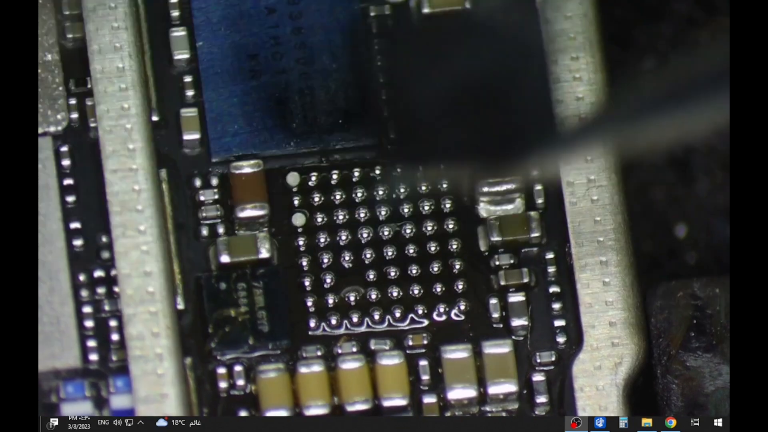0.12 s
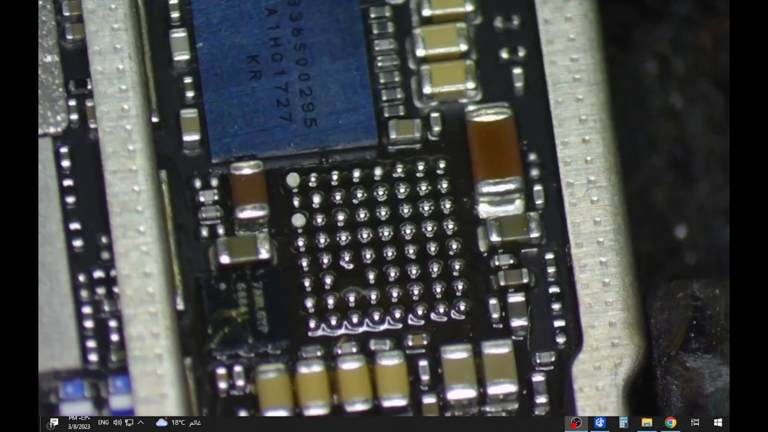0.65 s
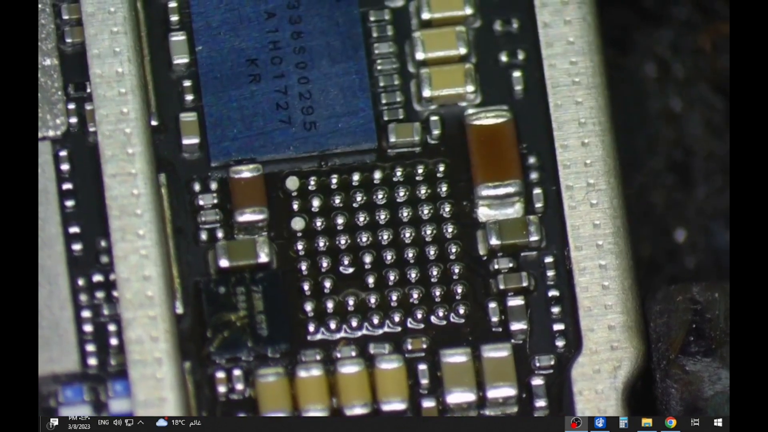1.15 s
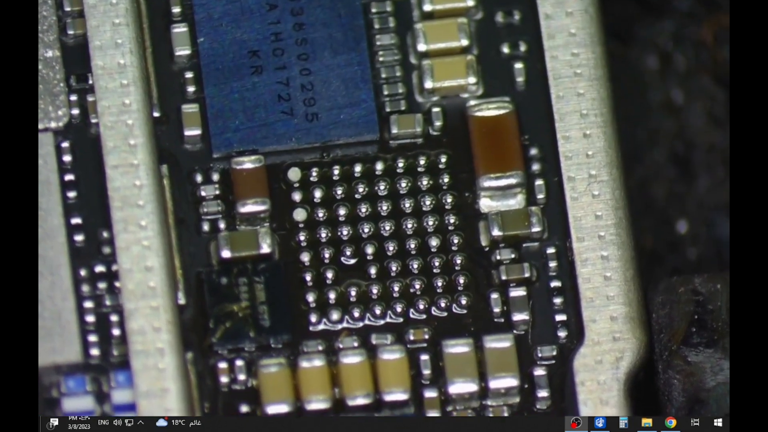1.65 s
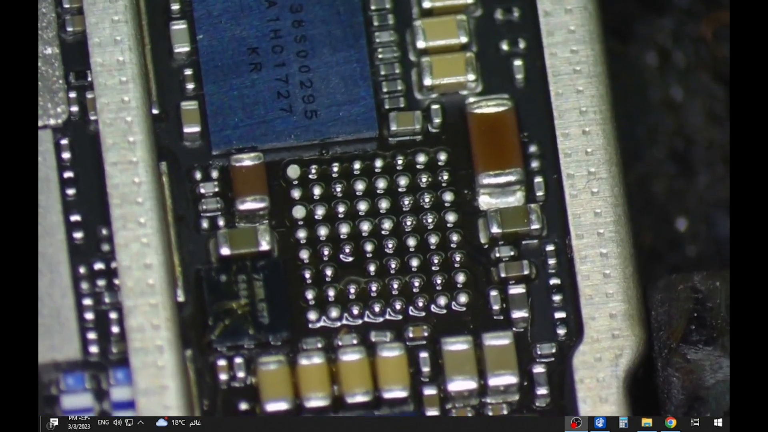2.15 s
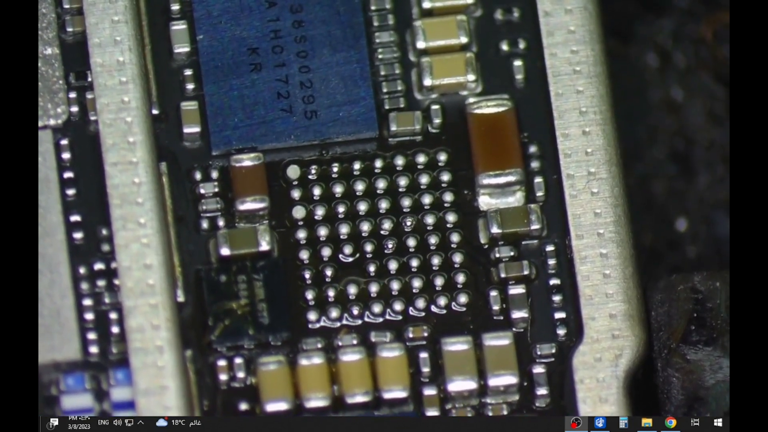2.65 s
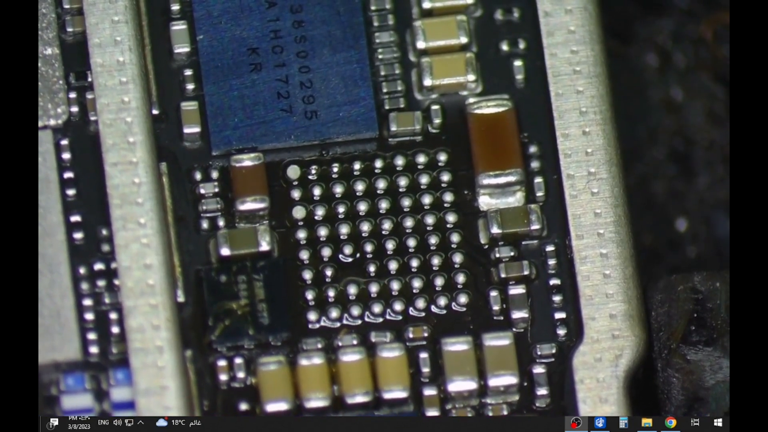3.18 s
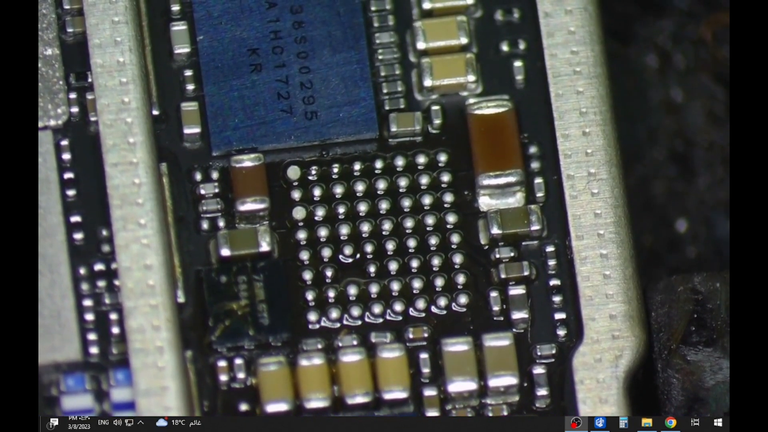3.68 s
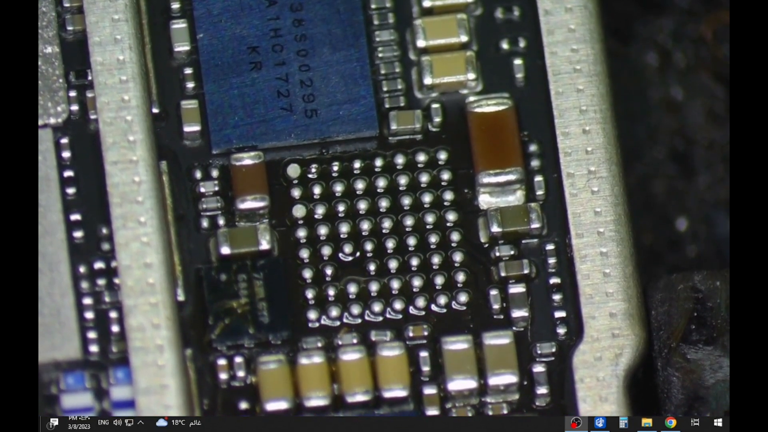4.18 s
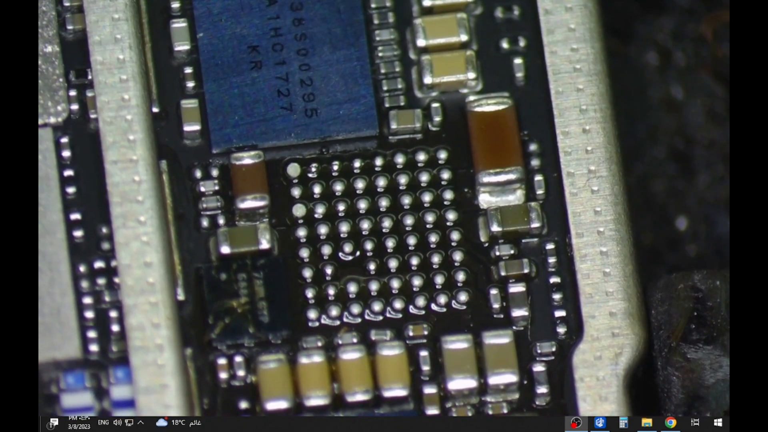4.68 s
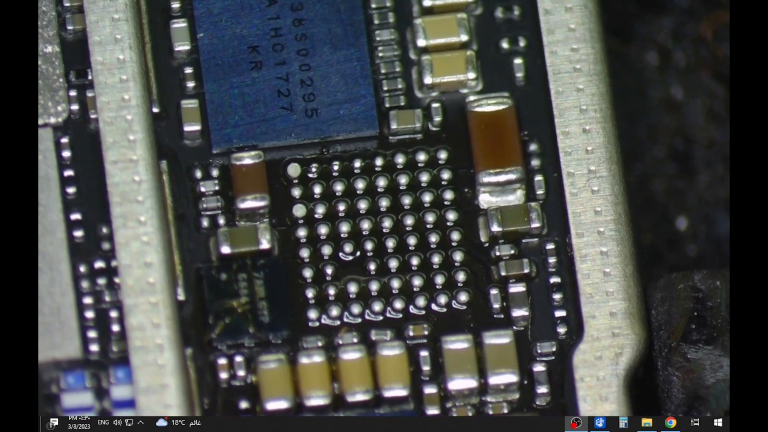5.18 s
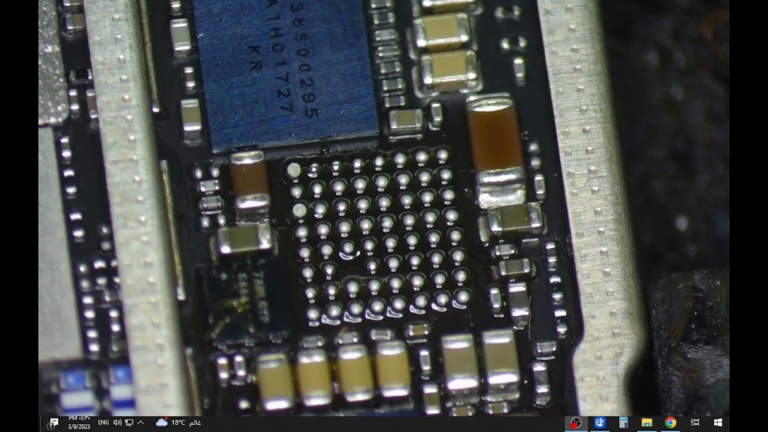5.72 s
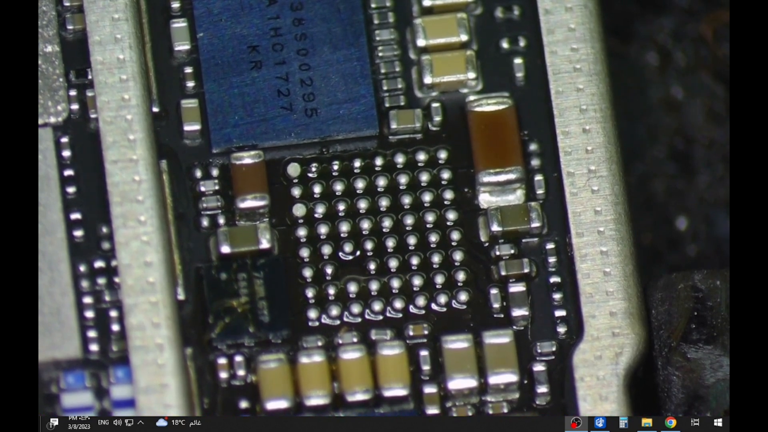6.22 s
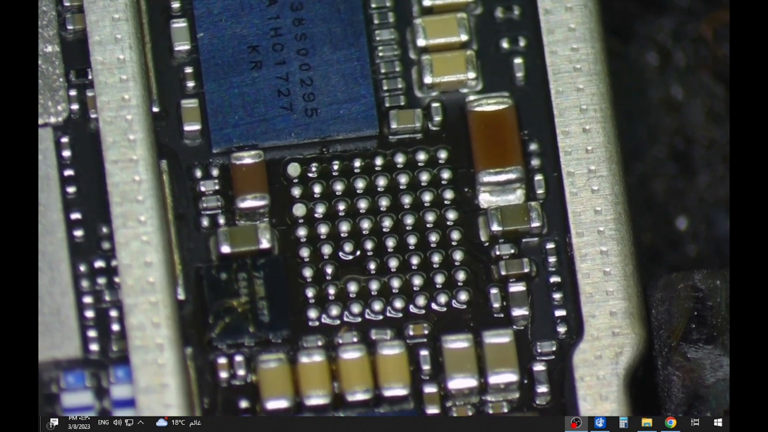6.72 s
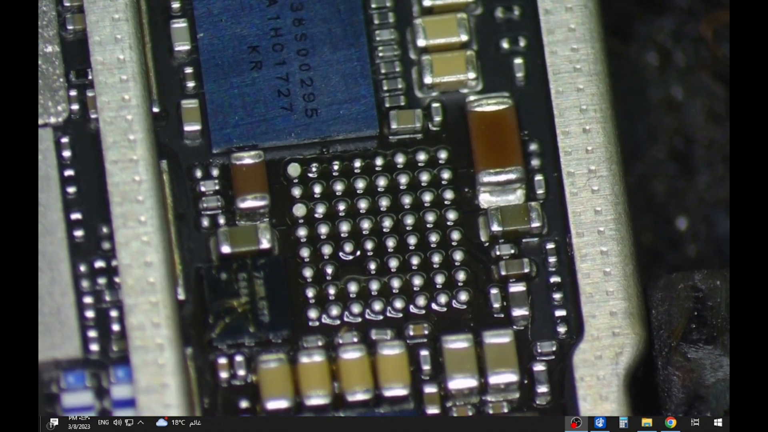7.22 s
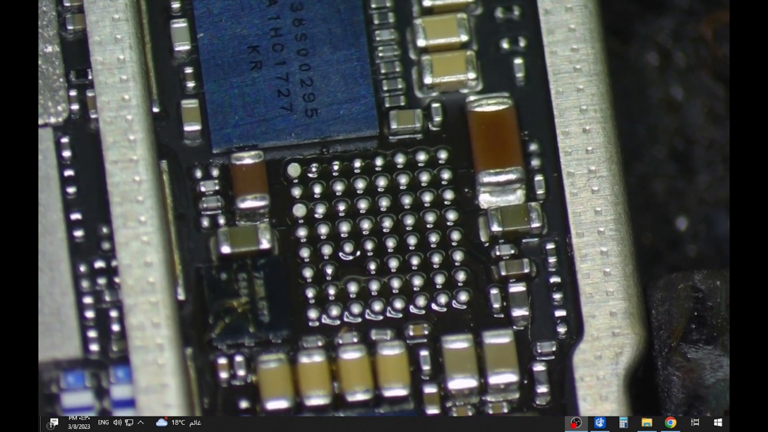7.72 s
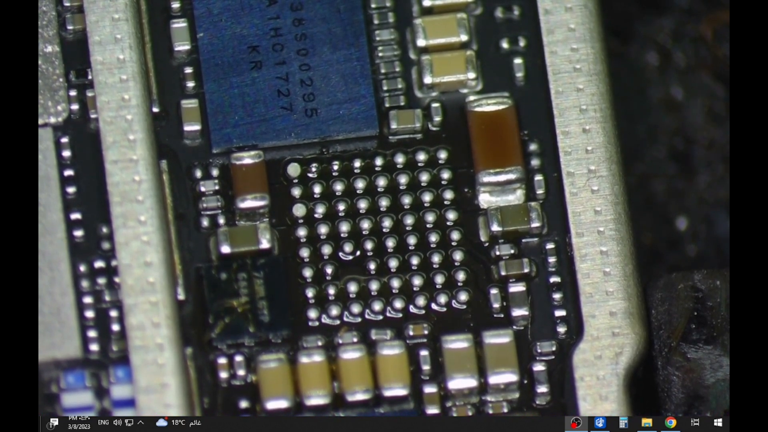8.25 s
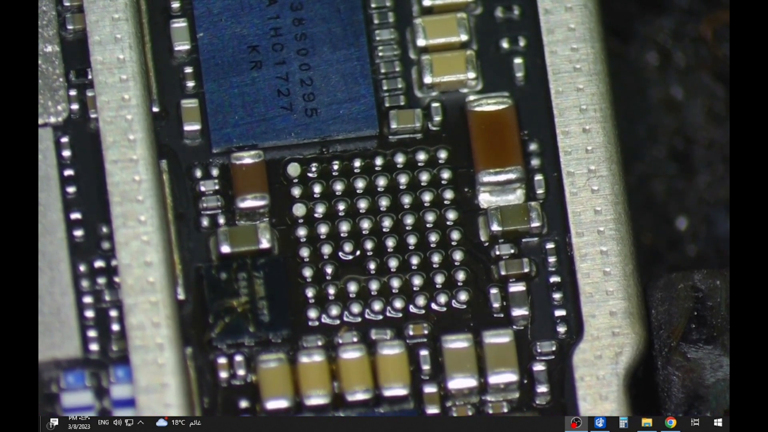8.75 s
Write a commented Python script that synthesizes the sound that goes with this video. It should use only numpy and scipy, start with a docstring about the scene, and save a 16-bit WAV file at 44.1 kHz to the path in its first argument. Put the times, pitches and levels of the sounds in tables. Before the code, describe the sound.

Close to a workbench, a hot-air jet hisses continuously, first broad, then thinner and sharper as it strikes a circuit board. A faint motor hum and very high whine lie beneath, with low room murmur. After four seconds a handpiece clatters loudly into a steel holder, with ringing rattles and wooden thuds. The air drops softer, then small tool ticks and knocks follow while the blower slowly speeds up and hiss returns.

```python
"""A hot-air rework jet hisses over a workbench: broad noise when free, sharper noise when striking the board.
Its blower motor hums in shaft multiples and its drive whines in the top treble; the blower speeds up to cool.
The handpiece clatters into a steel holder and tools tick: noise bursts through steel modes, and the modes ring.
Bench thuds are decaying bench modes; a low murmur of shaped noise lies below. Two microphone ports colour the
sound differently; separately, some treble bands are missing in one or both channels. A gain control ducks
whatever passes its limit."""
import sys
import numpy as np
from scipy import signal
from scipy.fft import rfft, irfft, next_fast_len
from scipy.io import wavfile
from scipy.ndimage import uniform_filter1d, map_coordinates

SR = 44100
rng = np.random.default_rng(int(sys.argv[2]) if len(sys.argv) > 2 else 0)


def bounce(signal):
    """Save signal as a 16-bit WAV file at the path given by the first command-line argument."""
    frames = np.transpose(np.atleast_2d(signal))
    limited = np.clip(frames, -1, 1)
    pcm = np.round(limited * 32767).astype(np.int16)
    wavfile.write(sys.argv[1], SR, pcm)


def boost(x):
    """Linear amplitude factor 10**(x/20) for a level x in decibels (scalar or array-like)."""
    u = np.asarray(x, float) / 20
    return 10 ** u


N = 391166


def unit(x):
    """Scale to rms 1."""
    return x / np.sqrt(np.mean(x ** 2) + 1e-20)


def along(points, hz):
    """Each column of (frequency [Hz], value, ..) points, read on a log axis."""
    f, *cols = np.transpose(points)
    return np.array([np.interp(np.log(hz + 1), np.log(f + 1), c) for c in cols])


def curves(rows):
    """One value per sample for each column after the time."""
    s, *cols = np.transpose(rows)
    return [np.interp(np.arange(N) / SR, s, c) for c in cols]


def wobble(knots_per_s):
    """Smooth random curve through normally distributed knots."""
    knots = rng.standard_normal(int(N * knots_per_s / SR) + 4)
    return map_coordinates(knots, [np.arange(N) * knots_per_s / SR])


def pan(left_minus_right_db):
    """Gains of the two channels."""
    return boost([[left_minus_right_db / 2], [-left_minus_right_db / 2]])


def filtered(x, response):
    """x times a response of frequency."""
    m = next_fast_len(x.shape[-1] + 8192)
    return irfft(rfft(x, m) * response(np.fft.rfftfreq(m, 1 / SR)), m)[..., :x.shape[-1]]


# left-right likeness of source noise: (frequency [Hz], likeness [0-1])
LIKENESS = [(60, .98), (130, .95), (290, .6), (640, .5), (1400, .5)]


def noise(spectrum, patchy_db):
    """Stereo noise of rms 1 with patches of random gain, most alike in the bass."""
    z = signal.stft(rng.standard_normal((2, N)), nperseg=512)[2]
    field = uniform_filter1d(rng.standard_normal(z.shape[1:]), size=5, axis=0)
    field = uniform_filter1d(field, size=14, axis=1)
    pair = signal.istft(z * boost(patchy_db * unit(field)), nperseg=512)[1][:, :N]

    def mid_side(hz):
        angle = np.arccos(np.clip(along(LIKENESS, hz)[0], -1, 1)) / 2
        return boost(along(spectrum, hz)) * [np.cos(angle), np.sin(angle)]

    mid, side = filtered(pair, mid_side)
    return unit(np.array([mid + side, mid - side]))


def echoes(x, decay, delay_s):
    """Each frequency of the answer dies at its own speed; each port hears another answer."""
    hz, t, z = signal.stft(rng.standard_normal((2, SR // 2)), SR, nperseg=128)
    tail = signal.istft(z * boost(-60 * t / along(decay, hz).T), SR, nperseg=128)[1]
    late = np.pad(x, ((0, 0), (round(delay_s * SR), 0)))
    return signal.fftconvolve(late, tail / np.linalg.norm(tail, axis=1, keepdims=True), axes=1)[:, :N]


# room and bench murmur: (frequency [Hz], relative density [dB])
MURMUR_SPECTRUM = [(13, -47), (22, -12), (81, -11), (156, -1), (179, -10.5), (216, -9.5), (366, -16),
                   (427, -9.5), (484, -18.5), (548, -13.5), (660, -20), (747, -25.5), (900, -19.5),
                   (1170, -66), (1980, -120)]


def murmur():
    """Low noise with room and bench resonances, its level swaying slightly."""
    sway_db = .6 * wobble(5)
    return boost(-28.5 + sway_db) * noise(MURMUR_SPECTRUM, patchy_db=2.05)


# room decay: (frequency [Hz], t60 [s])
ROOM_DECAY = [(200, 0.93), (2000, 0.04), (10000, 0.035)]


def room(metal):
    """The room answers the metal contacts with a diffuse tail."""
    return boost(-3.5) * echoes(metal, ROOM_DECAY, delay_s=.007)


# bench thuds: (time [s], peak level [dB], centre pitch [Hz], spread [octaves])
BENCH_THUDS = [(4.172, 1, 260, 1.46), (4.286, 4.5, 198, 1.35), (4.361, 3.5, 115, 1.6),
               (4.765, -2, 316, 0.96), (4.849, 12.5, 210, 1.25), (5.05, -16, 89, 0.23),
               (5.576, -10, 355, 1.9), (5.618, -7, 400, 1.9), (5.634, -23, 407, 1.4),
               (6.711, -8.5, 91, 0.92), (7.552, -25, 378, 0.13), (7.977, -14.5, 204, 0.16),
               (7.692, -11.5, 75, 0.63), (8.329, -19, 60.3, 0.57), (8.521, -14, 60, 0.57),
               (8.66, -10.5, 280, 0.55), (8.732, -0.5, 334, .23), (8.745, 3, 325, 0.4),
               (8.765, -8.5, 109, 0.45), (8.804, -3.5, 365, 0.2)]
# free bench-top modes: (frequency [Hz], t60 [s])
BENCH_MODES = [(62, 0.63), (95, 0.43), (120, 0.79), (180, 0.53), (215, 0.33), (250, 0.51), (330, 0.33),
               (365, 0.32), (436, 0.45), (520, 0.39), (640, 0.19), (775, 0.54), (900, 0.39)]
HELD_SHARE, HELD_SLOPE = 0.41, -0.14  # share of free decay left under the hand at 200 Hz; power law in pitch


def thuds():
    """A blow rings bench modes around its centre pitch; higher contacts are damped sooner."""
    out, t = np.zeros(N + SR), np.arange(SR // 2) / SR
    for s, peak_db, hz, spread in BENCH_THUDS:
        damping = HELD_SHARE * (hz / 200) ** HELD_SLOPE
        ring = 0
        for f, t60 in BENCH_MODES:
            mode_db = -6 * (np.log2(f / hz) / spread) ** 2 + rng.normal(0, 2)
            ring = ring + boost(mode_db - 60 * t / (t60 * damping)) * np.sin(2 * np.pi * f * t)
        ring = ring * (1 - np.exp(-t * hz / 0.5))  # a low thud swells more slowly
        out[round(s * SR):][:len(t)] += boost(peak_db) * ring / np.abs(ring).max()
    return out[:N] * pan(-2)


# steel holder modes: (frequency [Hz], relative level [dB], t60 [s])
STEEL_MODES = [(1453, -6, .3), (1900, -1, .4), (2350, -1, .5), (2842, -2, .3), (3219, -9, .3),
               (3515, -4, .3), (4050, -3, .35), (4205, 0, .4), (4330, -2, .35), (5200, -2, .3),
               (5545, -9, .3), (5973, -12, .3), (6224, -12, .4), (7130, -10, .25)]
RING_DB, FIZZ_DB = -5.5, -11.5  # modes and top-treble grit, gains beside the rattle level
ROUGHNESS_RAD = 0.24  # how far chatter shakes the mode phases


def steel(hz):
    """Response of the steel: resonances 140 Hz wide over a small direct path."""
    return .12 + sum(boost(db) * 1j * hz * 140 / (f * f - hz * hz + 1j * hz * 140) for f, db, _ in STEEL_MODES)


def steel_ring(t, hz, t60, chatter):
    """Steel modes near the contact's brightness, their phases shaken by chatter."""
    ring = 0
    for f, db, life in STEEL_MODES:
        mode_db = db - 18 * np.log2(f / hz) ** 2 + rng.normal(0, 2, (2, 1))
        decay_db = -60 * t / min(life, 1.5 * t60)  # a brief touch damps the ring
        phase = 2 * np.pi * (f * t + rng.random((2, 1))) + np.roll(chatter, round(f))
        ring = ring + boost(mode_db + decay_db) * np.sin(phase)
    return ring


def strike(blows, pan_db):
    """Each blow (time, crack dB, rattle dB, brightness Hz, t60) cracks, rattles the steel and rings its modes."""
    out, t = np.zeros((2, N + SR)), np.arange(SR // 2) / SR
    chatter = ROUGHNESS_RAD * wobble(88.9)[:len(t)]
    for s, crack_db, rattle_db, hz, t60 in blows:
        crack, grit = rng.standard_normal((2, 2, len(t))) * (1 - np.exp(-t / 0.00028))
        rattle = unit(filtered(grit, steel)) * boost(rattle_db - 60 * (t / t60) ** 1.1)  # it holds, then dies fast
        band = signal.butter(2, [hz / 2.37, min(hz * 1.84, .45 * SR)], "band", fs=SR, output="sos")
        body = signal.sosfilt(band, crack * boost(crack_db - 60 * t / .012) + rattle)
        snap = np.diff(crack, prepend=0) * boost(crack_db - 4.5 - 60 * t / 0.014)
        snap = snap * min(hz / 4000, 1) ** 0.98  # a hard first instant reaches the top treble
        fizz = boost(FIZZ_DB) * np.diff(grit, prepend=0) * boost(rattle_db - 60 * t / t60)
        ring = boost(rattle_db + RING_DB) * steel_ring(t, hz, t60, chatter)
        out[:, round(s * SR):][:, :len(t)] += (snap + fizz + body + ring) * pan(pan_db)
    return out[:, :N]


# tool contacts: (time [s], strength [dB], brightness [Hz], t60 [s])
TOOL_TICKS = [(2.43, -22, 14000, .03), (4.764, -13, 5580, .05), (5.5738, -6, 2730, 0.022),
              (5.6187, -3, 1680, 0.013), (5.636, -14, 1500, 0.021), (7.0268, 0.5, 5600, 0.0099),
              (7.092, 3, 6250, .011), (7.107, -21, 5000, .02), (7.2632, -14, 9150, 0.051),
              (7.435, -13, 7060, 0.0057), (7.6656, -5, 9650, 0.012), (7.6885, 0.5, 5130, 0.0098),
              (7.702, -5, 5300, 0.011), (7.714, -9, 6340, 0.019), (7.723, -4, 11400, 0.072),
              (7.734, -20, 5070, .02), (8.0566, -13, 9000, .02), (8.746, -1, 3020, 0.017)]


def ticks():
    """Tools tick on the bench: short contacts with the crack 4.5 dB over the rattle."""
    return strike([(s, db + 4.5, db, hz, t60) for s, db, hz, t60 in TOOL_TICKS], pan_db=-3.5)


# handpiece in its holder: (time [s], crack level [dB], rattle level [dB], brightness [Hz], rattle t60 [s])
HOLDER_CLATTERS = [(4.1717, 7, 5, 2400, 0.17), (4.2771, 14, -1, 3170, 0.38), (4.354, 4, 5.5, 4630, 0.37),
                   (4.6329, 10, -1.5, 1650, 0.11), (4.6598, 5, -9, 3760, 0.46), (4.773, 5, -3, 6160, 0.55),
                   (4.849, 15, -3.5, 1100, 0.2)]


def clatters():
    """The handpiece strikes its holder: cracks with longer rattles."""
    return strike(HOLDER_CLATTERS, pan_db=1.7)


# whine and top-treble swells: (start [s], end [s], gain [dB])
TREBLE_SWELLS = [(.4, .87, 7), (1.896, 3.37, 7.5), (3.518, 4.117, 7.5), (6.33, 7.2, 4.5), (7.7, 8.87, 5.5)]


def treble_db():
    """Common level of the drive whine and top treble: a rest level plus faded swells."""
    t, rest_db, fade_s = np.arange(N) / SR, -29.5, .12
    return rest_db + sum(db * np.clip(np.minimum(t - start, end - t) / fade_s + .5, 0, 1)
                         for start, end, db in TREBLE_SWELLS)


# blower speed: (time [s], speed [rev/s])
BLOWER_SPEED = [(0, 161.5), (5.1, 161.5), (8.87, 191)]
# motor drive switching: (time [s], frequency [Hz])
DRIVE_CARRIER = [(0, 13946), (5.5, 13946), (8.87, 13951)]
# shaft tones: (shaft multiple, relative level [dB])
HUM_ORDERS = [(1, -32), (2, -48), (25, -48), (26, -50)]
# how well the bench carries the shaft tones: (time [s], gain [dB])
BENCH_CARRY = [(0, -0.5), (4.2, 1.5), (5, 3.5), (6.5, -7.5), (7.4, -17), (7.9, 1.5), (8.87, 8)]
# whine lines: (shaft multiple off the carrier, relative level [dB])
WHINE_LINES = [(-8, -13), (-6, -18), (-4, -14), (-2, -3.5), (0, 0), (2, -1.5), (4, -17)]


def motor(top_db):
    """Shaft tones carried by the bench, and a switching whine flanked by even shaft multiples."""
    shaft, carrier = (2 * np.pi * np.cumsum(curves(c)[0]) / SR for c in (BLOWER_SPEED, DRIVE_CARRIER))
    carried_db = curves(BENCH_CARRY)[0]
    hum = sum(np.sqrt(2) * boost(db + carried_db + 2.2 * wobble(9)) * np.sin(k * shaft) for k, db in HUM_ORDERS)
    whine = sum(boost(db + 0.91 * wobble(11.0)) * np.sin(carrier + k * shaft) for k, db in WHINE_LINES)
    return hum + boost(top_db) * whine


# reflections close to the microphone: (frequency [Hz], t60 [s])
BENCH_DECAY = [(300, 0.016), (1500, 0.11), (10000, 0.017)]


def bench_reflections(air):
    """Short bench reflections comb the air; the hand never holds the nozzle still, so the comb drifts."""
    turn_rad = 1.8 * wobble(1.1)
    first, second = (echoes(air, BENCH_DECAY, delay_s=.001) for _ in range(2))
    return boost(-4) * (np.cos(turn_rad) * first + np.sin(turn_rad) * second)


def swish():
    """The jet sweeps past an edge: a brief Gaussian burst of noise around 5.2 kHz."""
    centre_s, width_s, level_db, hz = 6.347, .022, -18, 5200
    swell = boost(level_db) * np.exp(-((np.arange(N) / SR - centre_s) / width_s) ** 2)
    return swell * noise([(hz / 2, -30), (hz, 0), (2 * hz, -8), (3 * hz, -40)], patchy_db=0.5)


# handpiece: (time [s], air level [dB], share of the jet striking the board [0-1])
NOZZLE_MOVES = [(0, -15, 0.2), (.3, -16.5, 0.27), (.5, -21.5, .75), (.8, -20.5, 0.86), (4.1, -21.5, 0.94),
                (4.55, -15, .03), (5.1, -25.5, 0.11), (5.6, -24, 0), (6.3, -20, 0.23), (7, -19, 0.29),
                (8, -21.5, 0.28), (8.5, -16.5, 0.3), (8.87, -15, 0.12)]
# free jet: (frequency [Hz], relative density [dB])
FREE_SPECTRUM = [(400, -120), (600, -8.5), (2000, 0.5), (5500, 0.4), (6300, 5.5), (7100, -5.3),
                 (11000, 1.5), (16500, 0.5), (18000, -120)]
# striking jet: (frequency [Hz], relative density [dB])
STRIKING_SPECTRUM = [(1500, -120), (2500, -13.5), (4500, -5.5), (6000, -1.5), (7200, -0.5), (8500, 2.5),
                     (11000, -1.5), (13000, -11.5), (14000, -120)]
# top treble: (frequency [Hz], relative density [dB])
TOP_SPECTRUM = [(12000, -120), (12800, -10), (13600, 0), (16500, 0), (18000, -120)]


def jet(top_db):
    """Turbulent air: the free jet is broad, the striking jet sharp; their powers share the air level."""
    air_db, striking = curves(NOZZLE_MOVES)
    striking = np.clip(striking, 0, 1)
    flutter = boost(0.11 * wobble(15) + 0.86 * wobble(25))  # the jet is never quite steady
    rush = boost(air_db) * np.sqrt(1 - striking) * noise(FREE_SPECTRUM, patchy_db=2.26)
    hiss = boost(air_db) * np.sqrt(striking) * noise(STRIKING_SPECTRUM, patchy_db=1.0)
    top = boost(top_db - 6) * noise(TOP_SPECTRUM, patchy_db=.6)
    return flutter * (rush + hiss) + swish() + top


def scene():
    """Murmur, handling in the room, motor, and the air with its bench reflections."""
    metal = ticks() + clatters()
    top_db = treble_db()
    air = jet(top_db)
    return murmur() + room(metal) + thuds() + metal + motor(top_db) + bench_reflections(air) + air


def gain_control(x, limit_db, release_db_per_s, attack_s):
    """Gain drops by whatever passes the limit and climbs back at a steady rate."""
    loud_db = 10 * np.log10(np.abs(uniform_filter1d((x ** 2).max(0), size=160)) + 1e-12)
    climb_db = release_db_per_s * np.arange(N) / SR
    cut_db = np.maximum.accumulate(np.maximum(loud_db - limit_db, 0) + climb_db) - climb_db
    keep = np.exp(-1 / (SR * max(attack_s, 1e-4)))
    return x * boost(-signal.lfilter([1 - keep], [1, -keep], cut_db))


# microphone port colour, and apart from it treble bands missing in one or both channels (-50 and -70 dB):
# (frequency [Hz], left gain [dB], right gain [dB])
PORT_COLOUR_AND_EMPTY_BANDS = [(1500, 0, 0), (2300, 2, 1), (3300, 5, 6), (3750, -3, 1), (4500, 2, 4), (5400, -2, 11),
                               (6300, -10, 15), (7000, -3, 14), (7800, 10, 12), (8600, 10, -4), (9100, 10, -50),
                               (10600, 4, -50), (11300, 2, -12), (12500, -2, -4), (14000, -13, 4), (14500, -50, 4),
                               (15400, -70, 3), (15700, -70, -70)]


def microphone_ports(dry):
    """Each port has its own colour; apart from that, some treble bands are empty in one or both channels. The
    right port hears later, and both are weak in the deep bass."""
    right_lag_s = .00025

    def response(hz):
        lag = np.exp(-2j * np.pi * np.outer([0, right_lag_s], hz))
        return boost(along(PORT_COLOUR_AND_EMPTY_BANDS, hz)) * lag * 1j * hz / (35 + 1j * hz)

    return filtered(dry, response)


def top_cut(x):
    """Nothing passes above the cut-off."""
    return signal.sosfilt(signal.butter(12, 16370, fs=SR, output="sos"), x)


def record(dry):
    """Microphone ports, gain control, then clipping at full scale."""
    ported = boost(-6.5) * microphone_ports(dry)
    ducked = gain_control(ported, limit_db=-6.5, release_db_per_s=30.0, attack_s=0.00052)
    mix = np.clip(ducked, -1, 1)
    return top_cut(mix)


dry = scene()
out = record(dry)
bounce(out)
```